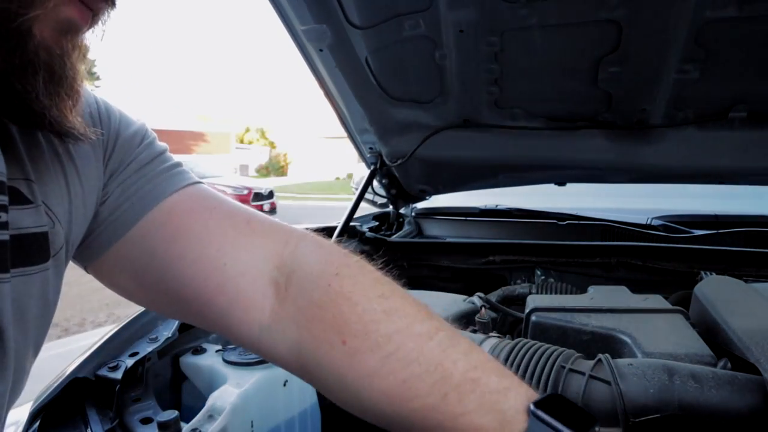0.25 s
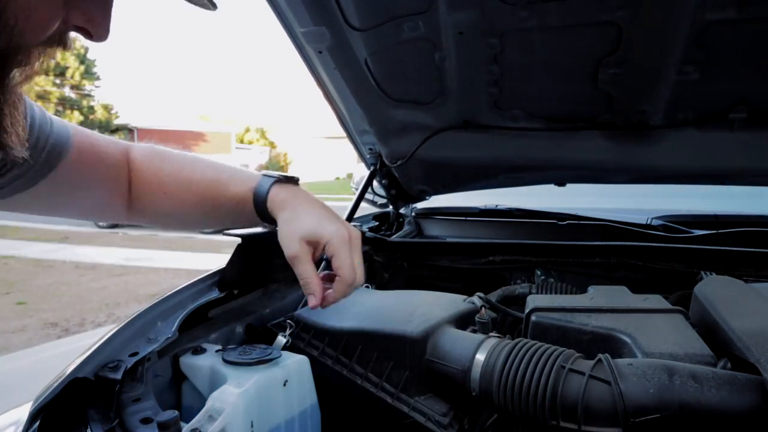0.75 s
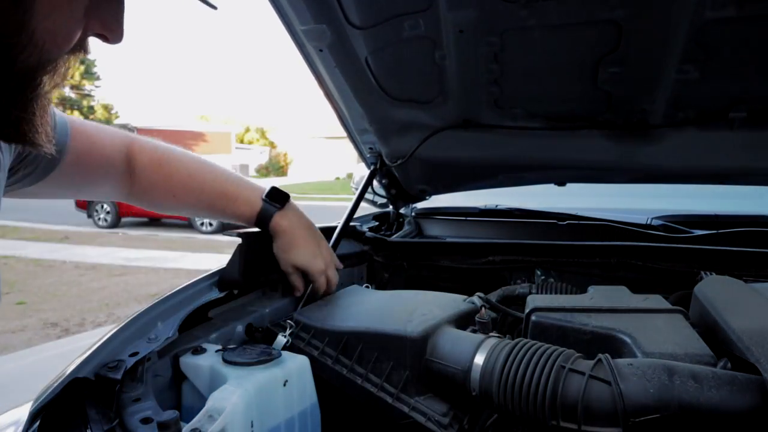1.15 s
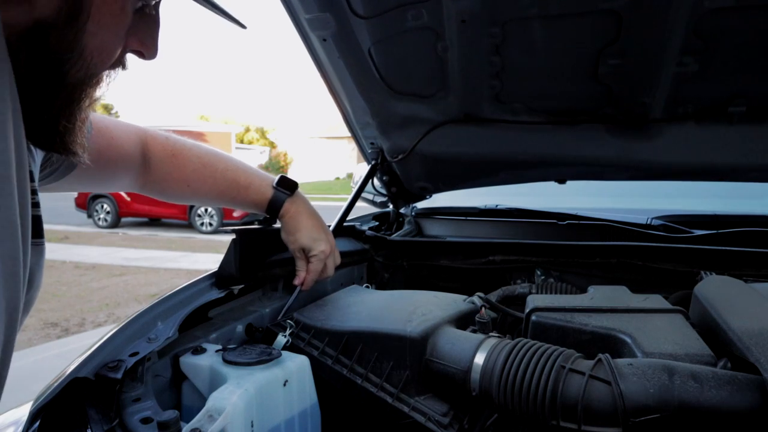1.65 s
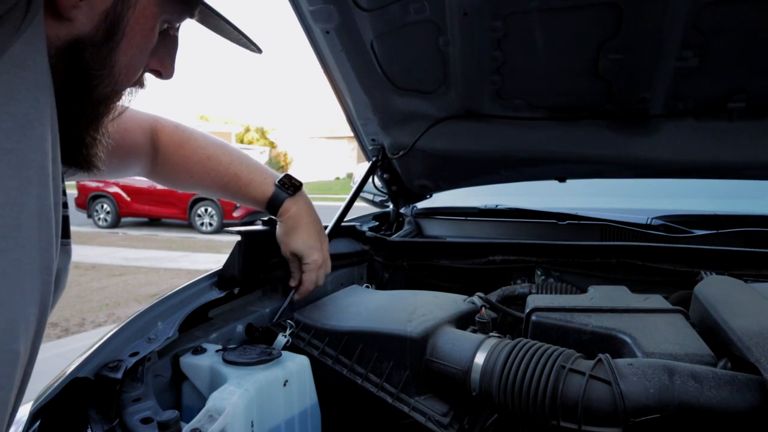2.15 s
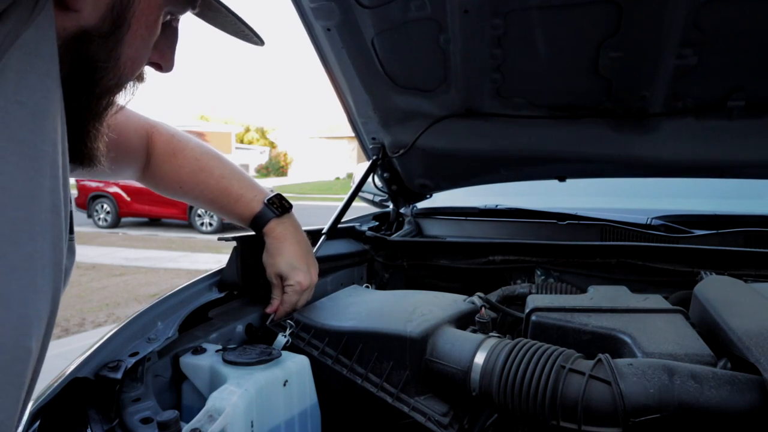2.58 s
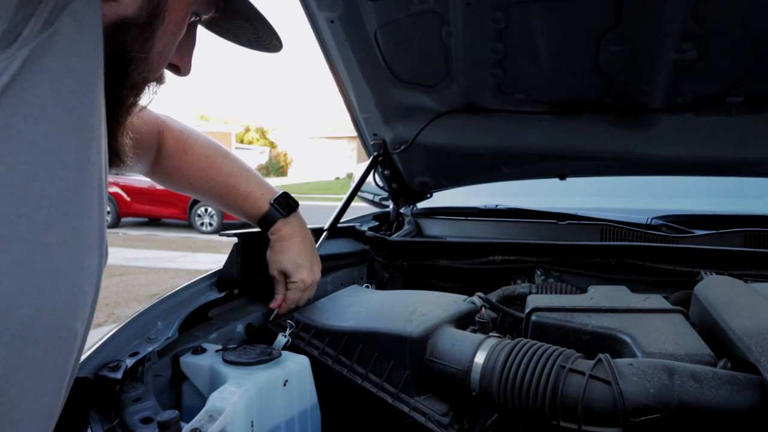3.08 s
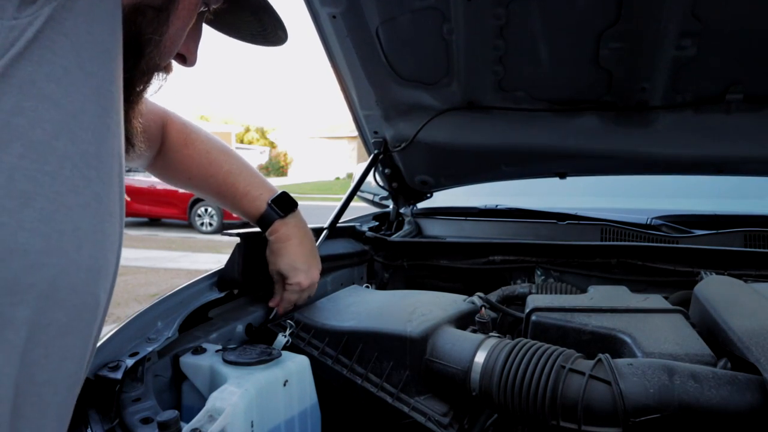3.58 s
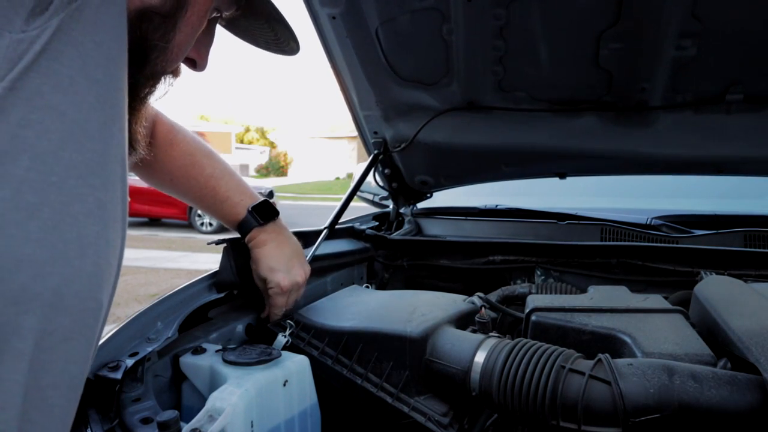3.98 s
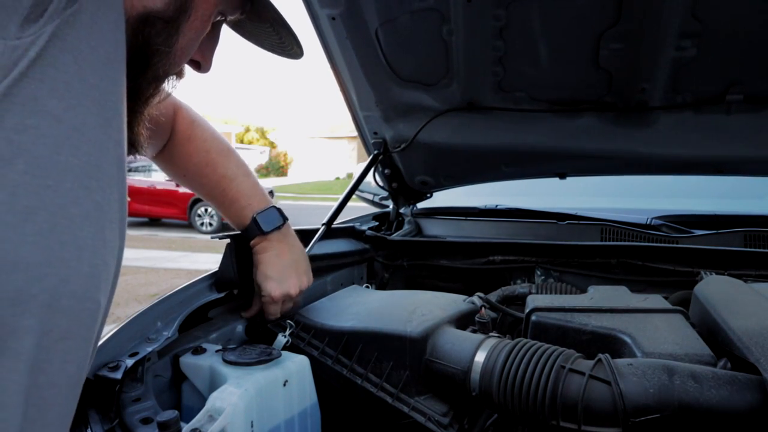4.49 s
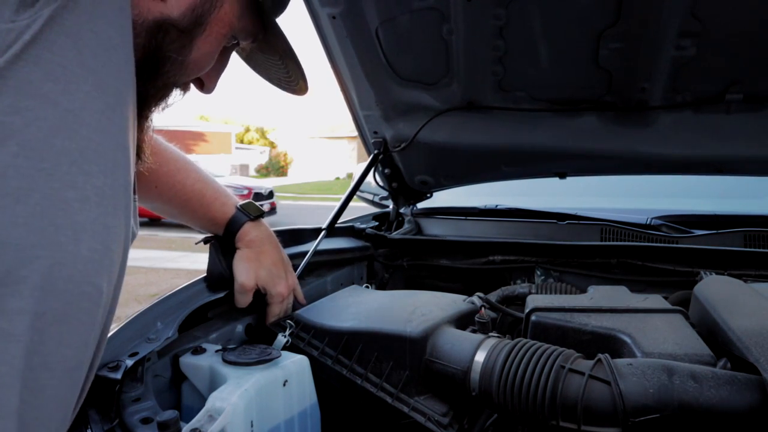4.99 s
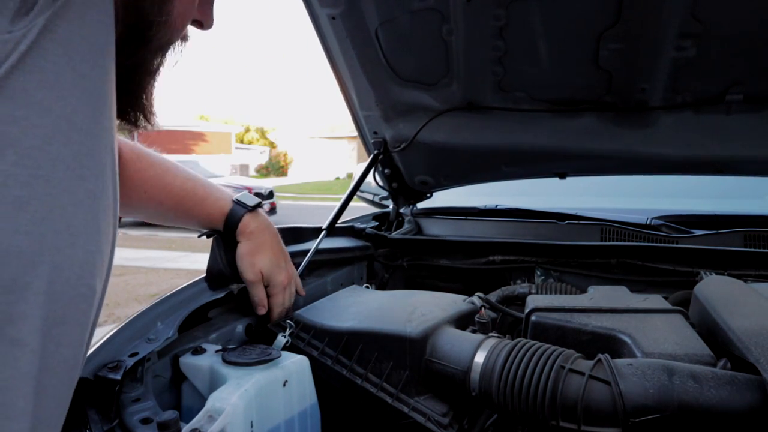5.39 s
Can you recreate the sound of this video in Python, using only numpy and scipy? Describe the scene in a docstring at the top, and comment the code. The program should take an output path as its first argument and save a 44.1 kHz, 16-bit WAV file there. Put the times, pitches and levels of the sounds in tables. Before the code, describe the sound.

Small metallic and plastic clicks, knocks and scrapes under an open car hood, ending in a loud sharp snap, over a steady distant street roar.

```python
"""A light knock and a metallic scrape are heard first, over the steady roar of a distant street.
Under an open vehicle hood a hand works a gas strut socket onto its ball stud, ending in a sharp snap.
Impacts and frictional slips excite damped modes and dense reflections in the engine bay.
Shaped noise gives the rustle of sleeve and skin, the street and the hiss; a gliding sine gives a squeak."""
import sys
import numpy as np
from scipy import signal
from scipy.io import wavfile
from scipy.ndimage import uniform_filter1d, map_coordinates

SR = 44100
rng = np.random.default_rng(int(sys.argv[2]) if len(sys.argv) > 2 else 0)


def inscribe(sig):
    """Save sig as 16-bit PCM at rate SR to the path in sys.argv[1].

    A 1-D sig is mono; a 2-D sig holds one channel per row.
    Samples are clipped to [-1, 1] before scaling.
    """
    pcm = np.round(np.clip(np.atleast_2d(sig).T, -1, 1) * 32767)
    wavfile.write(sys.argv[1], SR, pcm.astype(np.int16))


def decibels_to_gain(level_db):
    """Convert a level in decibels to a linear amplitude gain (20 dB per decade)."""
    exponent = np.asarray(level_db, float) / 20
    return 10 ** exponent


N = 248724  # length [samples]

# Impacts: (time [s], strut band peak [dB], weight: panel band re strut [dB],
# hardness: click band re strut [dB], contact time scale [ms])
CONTACTS = [(0.0284, -42, 1, -12, 5.4), (0.3111, -26.5, 4.5, -7, 5.6), (0.3236, -29.5, 3, -5, 8.8),
            (1.148, -44.5, 3, -4.5, 4.7), (1.1633, -41.5, -2.5, -4, 5), (1.2252, -51.5, -1, 1, 1.1),
            (1.427, -25, 7.5, -14.5, 3), (1.441, -38.5, 12, -20, 5), (1.454, -29.5, 9.5, -11, 1.7),
            (1.458, -27, 5.5, -30, 3.7), (1.4773, -32.5, 15, -19.5, 3.8), (1.5438, -50.5, 10, -6, 26),
            (1.7976, -70, -17, 5, 10), (1.9503, -30, -2.5, -46, 5.1), (1.965, -40, 7.5, -25, 10),
            (2.181, -48.5, 4, -29, 3.6), (2.2554, -46, 18.5, -1.5, 2.1), (2.267, -51.5, 32, -12, 2.5),
            (2.2822, -63.5, 33.5, -10, 11), (2.3172, -49, 21.5, -2.5, 5.8), (2.344, -56, 28, -20, 4.4),
            (2.3875, -59, 6, -5, 4.7), (2.5675, -19.5, -10.5, -16.5, 4.4), (2.5839, -26.5, -4.5, -21, 5.9),
            (3.3586, -39.5, 1, -15, 3.3), (3.371, -41, 12, -22, 1.4), (3.4727, -49, 15, -9, 2.4),
            (3.4841, -43, 15, -11.5, 7), (3.519, -60, 19, -23, 8), (3.5683, -67, 18.5, -8, 6.8),
            (3.6957, -48, 4.5, -3, 5.2), (3.8505, -36, -2, -31, 12), (3.989, -34.5, -4.5, -26, 12.3),
            (4.009, -44, -4.5, -22, 8), (4.4845, -41.5, 4.5, -8.5, 15.4), (4.545, -59, 12.5, 1, 1.6),
            (4.791, -51, 2.5, -5, 6), (4.8078, -51.5, 1, -15, 19), (4.839, -22.5, -1.5, -15, 15),
            (4.8522, -22.5, -17, -12, 11.3), (4.8647, -31, 6, -26, 9.2), (4.8994, -7.5, -6, -5.5, 6.2),
            (4.9052, -19, 2, -2, 5.7), (4.9247, -24.5, 10, -14, 10.7), (5.0496, -45, -1, -2.5, 1.8)]
# Edges of the panel, bracket, strut, click and top bands: (frequency [Hz])
BAND_EDGES_HZ = [175, 420, 1100, 3000, 6500, 15800]
# Bracket band re strut as the work moves on: (time [s], level [dB])
BRACKET_LEVEL = [(0.0, 2), (1.5, 5), (2.0, 0.5), (2.6, 0), (3.4, -2), (4.0, 3.5), (4.9, -2.5)]
BRACKET_FOLLOWS = 0.65  # dB of bracket band per dB of weight
TOP_DB, TOP_FOLLOWS = -1, 2.26  # top band re strut [dB], and dB added per dB of hardness
# Late low answer of the open hood: (frequency [Hz], level re panel band [dB], t60 [s], rise constant [s])
HOOD_BOOM = (113, -28, .3, .04)

# Modes of panels, bracket and strut: (frequency [Hz], mean level [dB], t60 [s])
MODES = [(252.8, 7, 0.24), (334.6, 10, 0.095), (397.8, -9.5, 0.29), (488.8, -2.5, 0.26), (565.4, 7.5, 0.18),
         (603, 9.5, 0.18), (711, 21, 0.027), (879, 16.5, 0.039), (969, 14, 0.051), (1096, 6.5, 0.049),
         (1251, 10.5, 0.045), (1305, 10, 0.055), (1427, -6.5, 0.19), (1562, 0, 0.11), (1653, 4, 0.09),
         (2420, 7.5, 0.052), (2600, -9, 0.18), (2840, -32.5, 0.033), (3280, -27, 0.077), (3630, -10, 0.1),
         (3880, -2.5, 0.058), (5560, -37, .085), (5980, -16, .11)]
# Decay of the engine bay: (frequency [Hz], t60 [s])
BAY_DECAY = [(200, 0.46), (600, 0.19), (1500, 0.076), (4000, 0.082), (8000, 0.038), (14000, 0.02)]
# Colour of the bay reflections: (frequency [Hz], level per Hz [dB])
ECHO_COLOUR = [(150, -14.5), (250, 8.5), (1200, -1.5), (3000, -13.5), (6500, -22), (15800, -29.5)]
# Gain of the bay reflections re the modes, one per band: (level [dB])
BAY_DB = [11, 19, 30, 41, 44]
# Gain of the direct impulse re the modes, one per band: (level [dB])
DIRECT_DB = [13, 50.8, 29.2, 32.8, 18.3]

# Crack of the spring clip in the top band: (peak time [s], level [dB], t60 [s])
SPRING_CLIP = (4.902, -27, 0.027)

# Rubbing strokes: (peak time [s], bracket band level [dB], rise [s], fall [s], strut band re bracket [dB])
STROKES = [(0.225, -45.5, 0.084, 0.11, -4.5), (0.488, -55, 0.063, 0.038, 1.5), (2.19, -44.5, .02, 0.19, -7),
           (2.239, -52.5, 0.063, 0.027, -15), (3.762, -55.5, .05, 0.044, -31),
           (3.812, -42, 0.014, 0.069, 2.5), (3.866, -33.5, 0.06, 0.087, -10), (4.484, -41, .03, 0.044, 0),
           (5.17, -64.5, 0.27, 0.12, 12.5)]
SCRAPE_PANEL_DB, SCRAPE_PANEL_FOLLOWS = -6.5, -0.5  # panel re bracket [dB], dB added per dB of strut
SCRAPE_CLICK_DB = -18.5  # click band re strut [dB]

# Squeak envelope before its lift: (peak time [s], level [dB], rise [s], fall [s])
SQUEAK = (3.778, -60, .025, .12)
SQUEAK_HZ, SQUEAK_SAG_HZ_PER_S, SQUEAK_END_S = 6000, 9000, 3.836

# Short sleeve and skin movements: (peak time [s], level [dB], rise [s], fall [s])
RUSTLE_MOVES = [(0.235, -64.5, .07, 0.21), (0.482, -67, .04, 0.078), (1.163, -61.5, 0.17, 0.1),
                (1.388, -58.5, 0.11, 0.097), (1.802, -58, .01, 0.037), (1.85, -65, .1, 0.51),
                (2.23, -58, 0.13, 0.13), (2.39, -71, 0.028, 0.24), (3.57, -65, .04, .03),
                (3.828, -59.5, 0.12, .09), (4.02, -63.5, .025, .08), (4.48, -70, .02, 0.085),
                (4.555, -59.5, 0.026, .07), (4.82, -66, .15, .06)]
# The arm draws back, sleeve sliding: (time [s], level [dB])
WITHDRAWAL = [(4.98, -66), (5.07, -59), (5.2, -57), (5.36, -56), (5.43, -55.5), (5.46, -56), (5.55, -52.5),
              (5.64, -61)]
# Colour of the cloth: (frequency [Hz], level per Hz [dB])
CLOTH_COLOUR = [(1500, -30), (3000, -9), (5000, -7), (6800, -3), (8000, 0), (9300, -3), (10400, -11),
                (12000, -7), (14000, -7), (15750, -13), (15900, -80)]
FADE_DB = 22  # a swell is this far down one rise before and one fall after its peak

# Decay of hood, ground and walls: (frequency [Hz], t60 [s])
YARD_DECAY = [(200, 0.61), (1000, 0.32), (4000, 0.25), (12000, 0.16)]
# Street levels: (time [s], rumble level [dB], tyre roar level [dB])
STREET_LEVEL = [(0.0, -59, -54), (1.5, -58, -53.5), (2.0, -59, -53.5), (3.3, -57, -52.5), (4.1, -58, -54),
                (5.0, -55, -53), (5.64, -54.5, -51.5)]
# Colour of the rumble: (frequency [Hz], level per Hz [dB])
RUMBLE_COLOUR = [(12, -27.5), (20, -10.5), (64, -8), (108, 9), (140, 0.5), (160, -7.5), (210, -28),
                 (350, -120)]
# Colour of the tyre roar: (frequency [Hz], level per Hz [dB])
ROAR_COLOUR = [(88, -28), (150, -5), (270, -3), (306, -3.5), (347, -7.5), (469, -7.5), (650, -3.5),
               (710, -9), (775, -4), (1050, -8), (3000, -27), (3900, -57), (6600, -120)]
# Colour of the microphone hiss: (frequency [Hz], level per Hz [dB])
HISS_COLOUR = [(1760, -29), (3000, -0.5), (4890, -3.5), (5900, -5.5), (8430, -6.5), (14800, -12.5),
               (15750, -15), (15900, -76.5)]
HISS_DB = -67


def contacts():
    """Impulsive excitation: each contact is a chatter of impacts convolved with the bay's response."""
    out = np.zeros(N + SR)
    t = np.arange(SR // 3) / SR
    boom = hood_boom(t)
    for time_s, strut_db, panel_db, click_db, ms in CONTACTS:
        bracket_db = np.interp(time_s, *np.transpose(BRACKET_LEVEL)) + BRACKET_FOLLOWS * panel_db
        top_db = TOP_DB + TOP_FOLLOWS * click_db
        here = out[round(time_s * SR):][:len(t)]  # a view into the output

        # uneven push that rises, then lets go
        u = t[:SR // 10] / (max(ms, .4) / 1000)
        chatter = np.abs(rng.standard_normal(len(u))) ** 2.66 * u ** .5 * np.exp(-1.5 * u)
        for response, band_db in zip(bay(t), [panel_db, bracket_db, 0, click_db, top_db]):
            part = signal.fftconvolve(chatter, response)[:len(t)]
            crest = np.sqrt(2 * np.abs(uniform_filter1d(part ** 2, size=350)).max())
            here += decibels_to_gain(strut_db + band_db) * part / crest
        boom_db = strut_db + panel_db + HOOD_BOOM[1]
        here += decibels_to_gain(boom_db) * rng.choice([-1, 1]) * boom
    return out[:N]


def hood_boom(t):
    """Delayed resonance: the open hood's low mode builds up slowly and decays exponentially; peak 1."""
    hz, _, t60, rise_s = HOOD_BOOM
    boom = (1 - np.exp(-t / rise_s)) ** 2 * decibels_to_gain(-60 * t / t60) * np.sin(2 * np.pi * hz * t)
    return boom / boom.max()


def bay(t):
    """Impulse response: modes, bay reflections and direct sound, divided into bands."""
    modes = ring(t)
    echoes = tail(t, BAY_DECAY, ECHO_COLOUR)
    direct = t == 0
    bands = []
    for low, high, bay_db, direct_db in zip(BAND_EDGES_HZ, BAND_EDGES_HZ[1:], BAY_DB, DIRECT_DB):
        sos = signal.butter(4, (low, high), "bandpass", fs=SR, output="sos")
        bands.append(signal.sosfilt(sos, modes + decibels_to_gain(bay_db) * echoes + decibels_to_gain(direct_db) * direct))
    return bands


def ring(t):
    """Modal superposition: damped sines of random strength and sign; shaking parts blur their pitch."""
    hz, db, t60 = np.transpose(MODES)[:, :, None]
    strength = decibels_to_gain(db + 2.2 * rng.standard_normal(hz.shape)) * rng.choice([-1, 1], hz.shape)
    phase_walk = np.cumsum(rng.standard_normal((len(hz), len(t))), axis=1)
    blur = 0.016 * np.sqrt(hz / 250) * phase_walk
    return np.sum(strength * decibels_to_gain(-60 * t / t60) * np.sin(2 * np.pi * hz * t + blur), axis=0)


def tail(t, decays, colour):
    """Diffuse reverberation: noise in which every frequency decays at its own rate."""
    hz, frame_s, z = signal.stft(rng.standard_normal(len(t)), SR, nperseg=256)
    gain_db = along(colour, hz)[:, None] - 60 * frame_s / along(decays, hz)[:, None]
    return signal.istft(z * decibels_to_gain(gain_db), SR, nperseg=256)[1][:len(t)]


def clip():
    """Sudden elastic release: the spring clip snaps round the ball as a decaying burst of bright noise."""
    time_s, db, t60 = SPRING_CLIP
    top = signal.butter(4, BAND_EDGES_HZ[-2:], "bandpass", fs=SR, output="sos")
    crack = unit(signal.sosfilt(top, rng.standard_normal(N)))
    return swell(time_s, db, 0.0033, t60 * FADE_DB / 60) * crack


def scrape():
    """Stick-slip friction: dense tiny slips excite the metal while the gripping hand damps its ringing."""
    t = np.arange(SR // 10) / SR
    slips = rng.standard_normal(N) ** 3 * decibels_to_gain(1.96 * wobble(90))
    hand_damping = decibels_to_gain(-60 * t / 0.23)
    bands = [unit(signal.fftconvolve(slips, response * hand_damping)[:N]) for response in bay(t)]
    panel, bracket, strut, click, _ = bands
    bright = strut + decibels_to_gain(SCRAPE_CLICK_DB) * click
    out = np.zeros(N)
    for *stroke, strut_db in STROKES:
        panel_db = SCRAPE_PANEL_DB + SCRAPE_PANEL_FOLLOWS * strut_db
        out += swell(*stroke) * (bracket + decibels_to_gain(panel_db) * panel + decibels_to_gain(strut_db) * bright)
    return out


def squeak():
    """Frictional oscillation: the sliding joint sounds a thin tone that sags once the push is past."""
    t = np.arange(N) / SR
    hz = SQUEAK_HZ - SQUEAK_SAG_HZ_PER_S * np.maximum(t - SQUEAK[0], 0) + 60 * wobble(300)
    envelope = (t < SQUEAK_END_S) * swell(*SQUEAK)
    flutter = decibels_to_gain(4.0 + 2.5 * wobble(150))  # lifts the tone by 4 dB on average
    return envelope * flutter * np.sin(2 * np.pi * np.cumsum(hz) / SR)


def rustle():
    """Fibre friction: sliding sleeve and skin give hiss with tiny snaps, swelling with each movement."""
    snaps = (rng.random(N) < 1200 / SR) * rng.standard_normal(N)  # about 1200 a second
    snaps = snaps * decibels_to_gain(4 * rng.standard_normal(N))
    source = rng.standard_normal(N) + .55 * unit(snaps)
    slide_db, = curves([(WITHDRAWAL[0][0] - .04, -110), *WITHDRAWAL])
    moves = sum(swell(*row) for row in RUSTLE_MOVES) + decibels_to_gain(slide_db + 1.6 * wobble(60))
    return moves * decibels_to_gain(2.8 * wobble(80)) * rush(source, CLOTH_COLOUR, patchy_db=2.2)


def yard(x):
    """Late reverberation: hood, ground and walls return a longer tail after 500 samples."""
    echo = tail(np.arange(SR // 2) / SR, YARD_DECAY, [(200, 1.6), (10000, 1.5)])
    return signal.fftconvolve(np.pad(x, (500, 0)), echo / np.linalg.norm(echo))[:N]


def street():
    """Broadband noise of many sources: distant traffic as a low rumble and a smooth tyre roar."""
    rumble_db, roar_db = curves(STREET_LEVEL)
    rumble = rush(rng.standard_normal(N), RUMBLE_COLOUR, patchy_db=.5)
    roar = rush(rng.standard_normal(N), ROAR_COLOUR, patchy_db=.7)
    return decibels_to_gain(rumble_db + 1.5 * wobble(3)) * rumble + decibels_to_gain(roar_db + .6 * wobble(6)) * roar


def hiss():
    """Electrical noise: the microphone adds a steady coloured hiss."""
    return decibels_to_gain(HISS_DB) * rush(rng.standard_normal(N), HISS_COLOUR, patchy_db=1.5)


def overload(x):
    """Saturation: the microphone input bends smoothly towards a ceiling of 0.98."""
    return x / (1 + np.abs(x / .98) ** 8) ** (1 / 8)


def swell(peak_s, db, rise_s, fall_s):
    """Exponential growth and decay: a gain that climbs to one peak and falls, evenly in dB."""
    t = np.arange(N) / SR - peak_s
    return decibels_to_gain(db - FADE_DB * np.maximum(-t / max(rise_s, .003), t / max(fall_s, .003)))


def rush(source, spectrum, patchy_db):
    """Spectral shaping: a source given a colour and patches of random gain, rms 1."""
    hz, _, z = signal.stft(source, SR, nperseg=1024)
    patches = uniform_filter1d(rng.standard_normal(z.shape), size=10, axis=0)
    patches = unit(uniform_filter1d(patches, size=5, axis=1))
    gain_db = along(spectrum, hz)[:, None] + patchy_db * patches
    return unit(signal.istft(z * decibels_to_gain(gain_db), SR, nperseg=1024)[1][:N])


def wobble(rate):
    """Slow random modulation: a smooth curve through random knots, rate knots a second."""
    knots = rng.standard_normal(int(N * rate / SR) + 4)
    return map_coordinates(knots, [np.arange(N) * rate / SR])


def curves(rows):
    """Linear interpolation in time: one value per sample for each column after the time."""
    s, *columns = np.transpose(rows)
    return [np.interp(np.arange(N) / SR, s, column) for column in columns]


def along(points, hz):
    """Logarithmic frequency scale: (frequency, value) points interpolated on a log axis."""
    f, v = np.transpose(points)
    return np.interp(np.log(hz + 1), np.log(f + 1), v)


def unit(x):
    """Power normalisation: scale to rms 1."""
    return x / np.sqrt(np.mean(x ** 2) + 1e-20)


def scene():
    """Superposition: all sources add at one microphone."""
    work = contacts() + scrape() + clip()
    return (work + decibels_to_gain(-18) * yard(work) + rustle() + squeak() + street())[None]


def top_cut(x):
    """Nothing passes above the cut-off."""
    return signal.sosfilt(signal.butter(12, 16490, fs=SR, output="sos"), x)


def record(dry):
    """Transduction: the microphone adds its hiss and its input saturates on strong peaks."""
    mix = overload(dry + hiss())
    return top_cut(mix)


dry = scene()
out = record(dry)
inscribe(out)
```